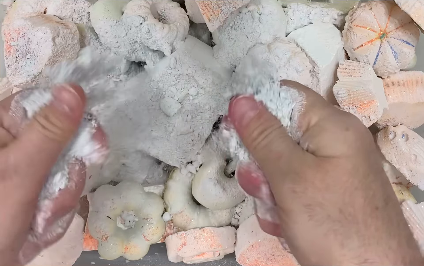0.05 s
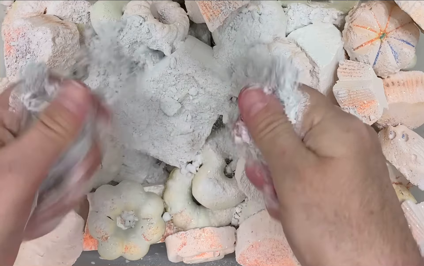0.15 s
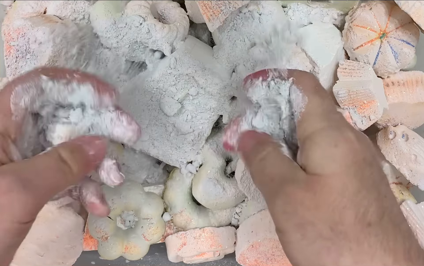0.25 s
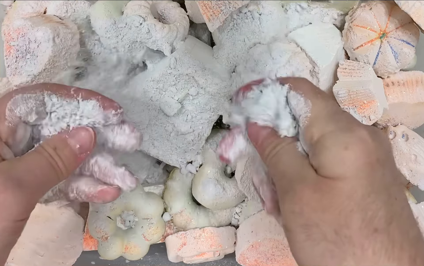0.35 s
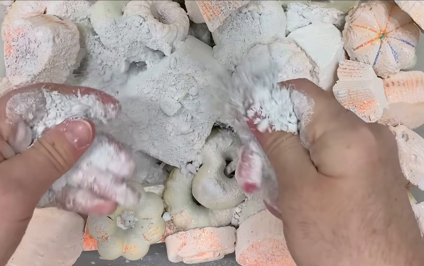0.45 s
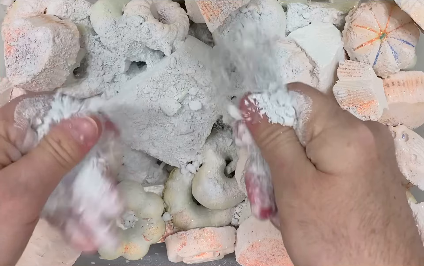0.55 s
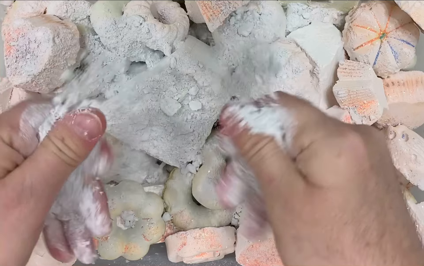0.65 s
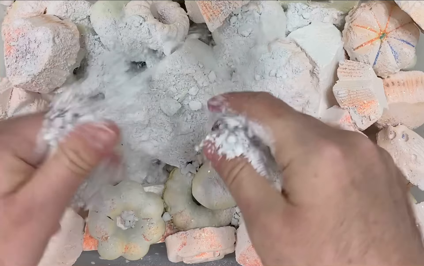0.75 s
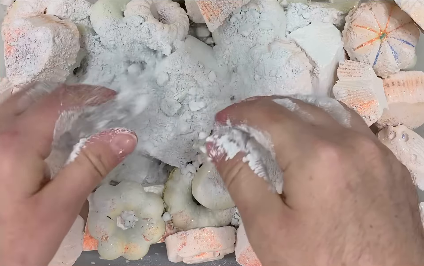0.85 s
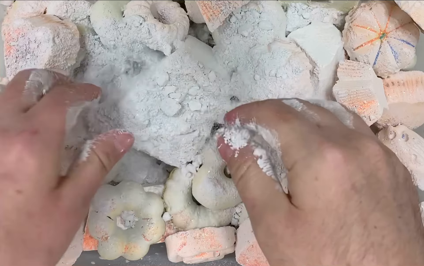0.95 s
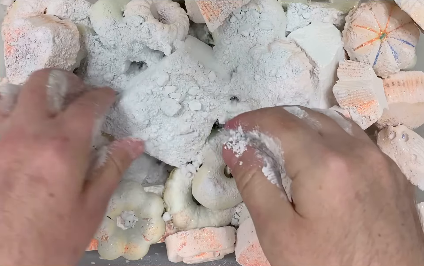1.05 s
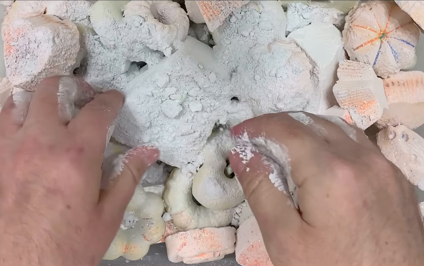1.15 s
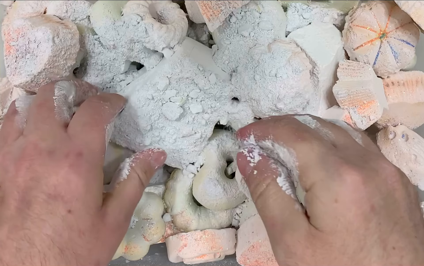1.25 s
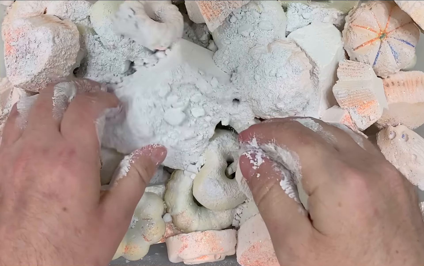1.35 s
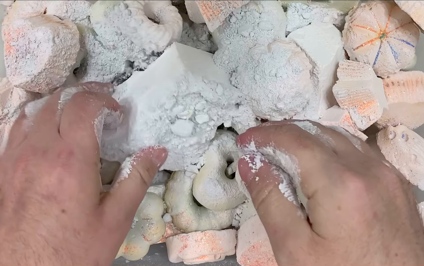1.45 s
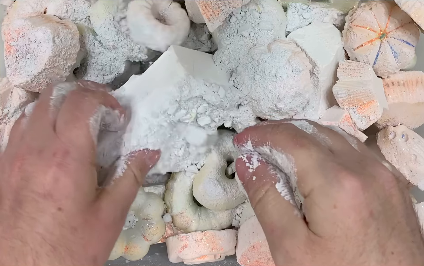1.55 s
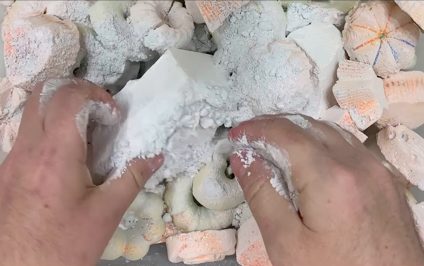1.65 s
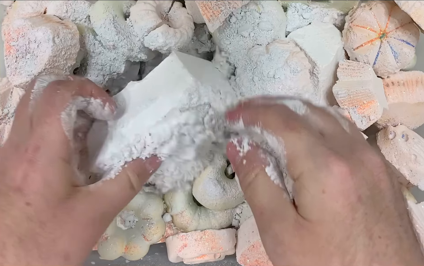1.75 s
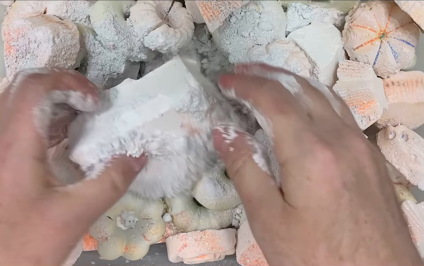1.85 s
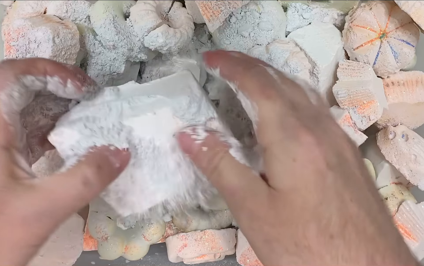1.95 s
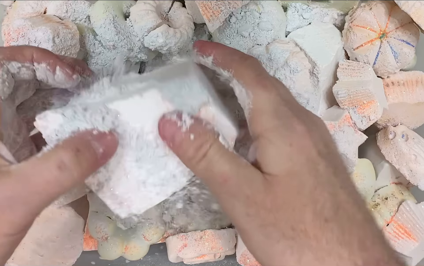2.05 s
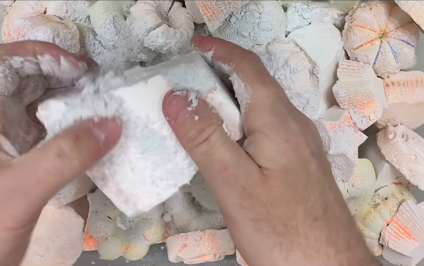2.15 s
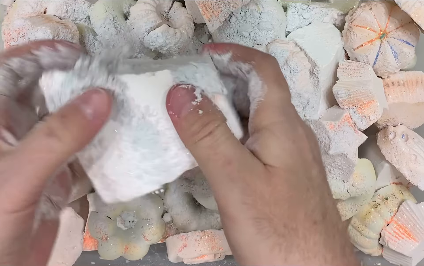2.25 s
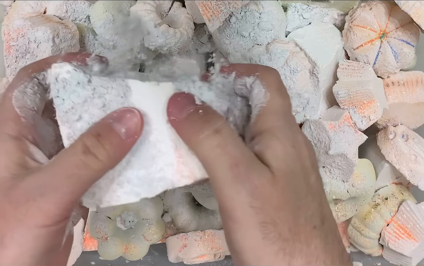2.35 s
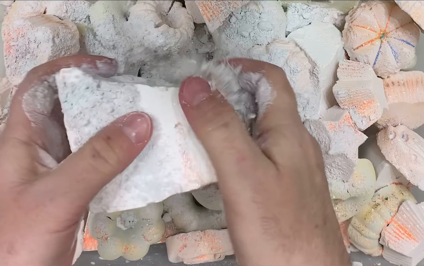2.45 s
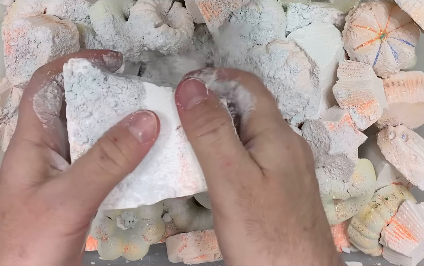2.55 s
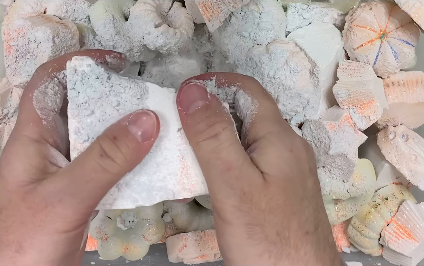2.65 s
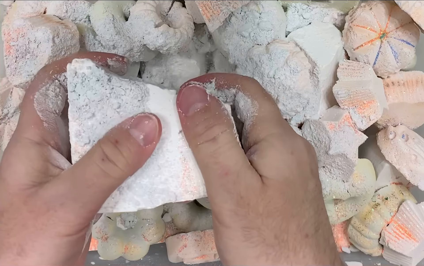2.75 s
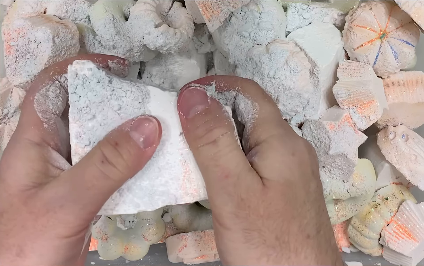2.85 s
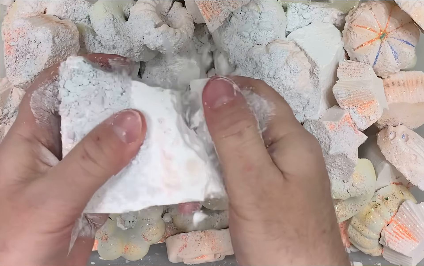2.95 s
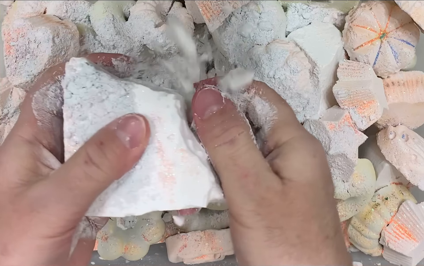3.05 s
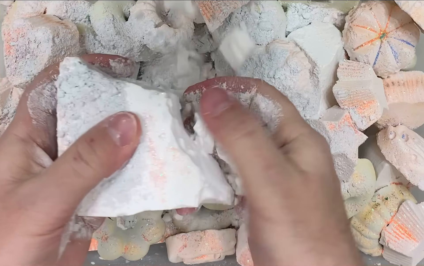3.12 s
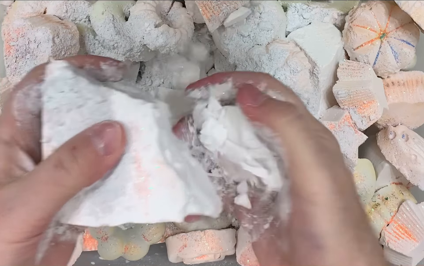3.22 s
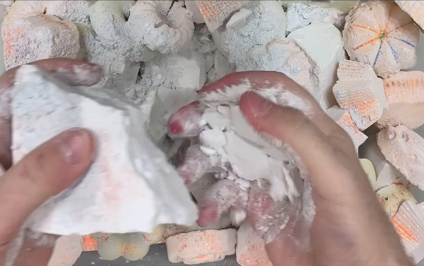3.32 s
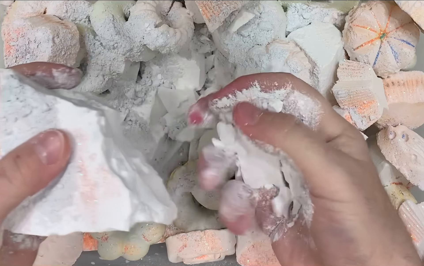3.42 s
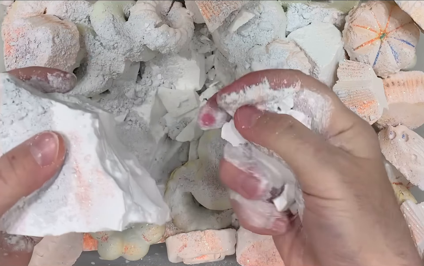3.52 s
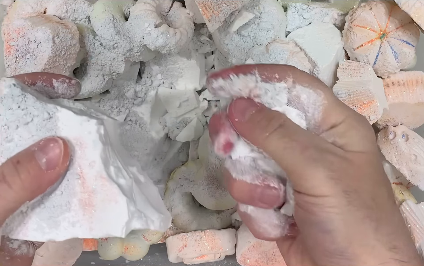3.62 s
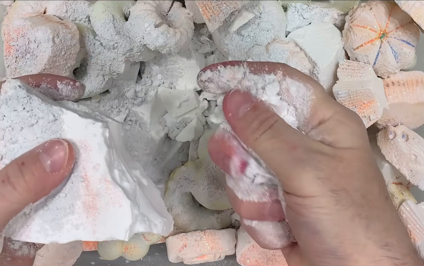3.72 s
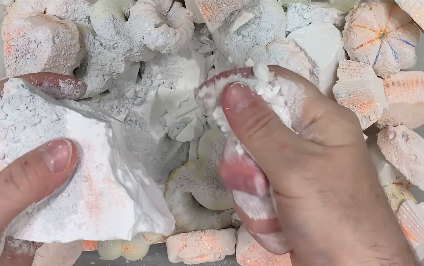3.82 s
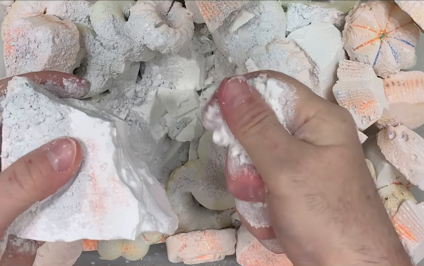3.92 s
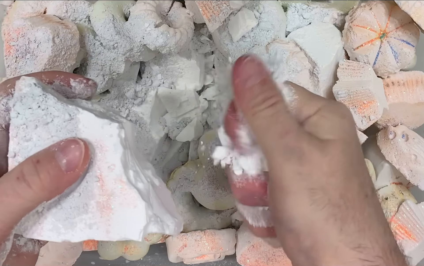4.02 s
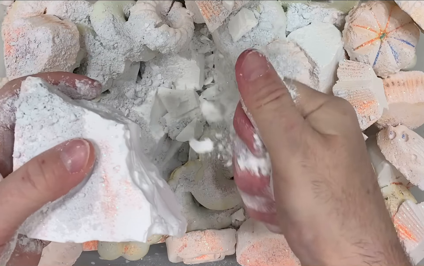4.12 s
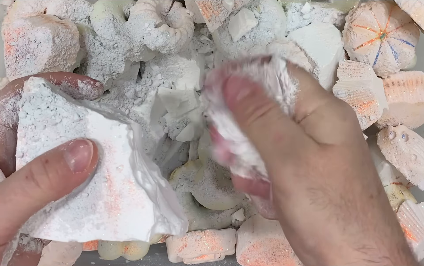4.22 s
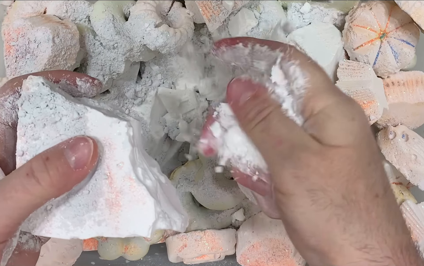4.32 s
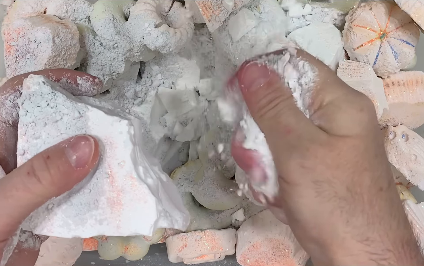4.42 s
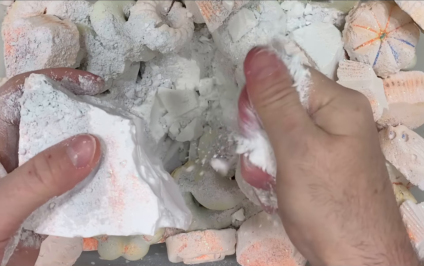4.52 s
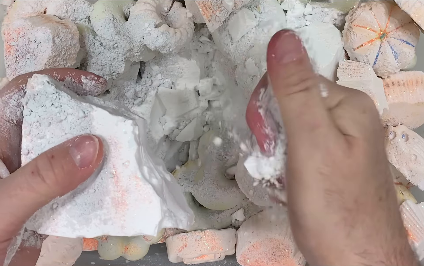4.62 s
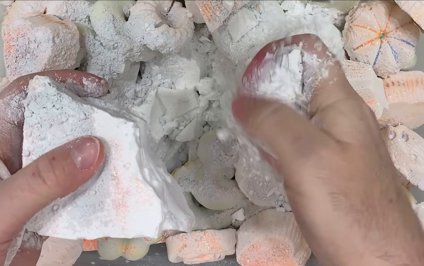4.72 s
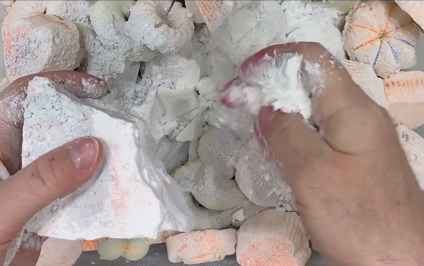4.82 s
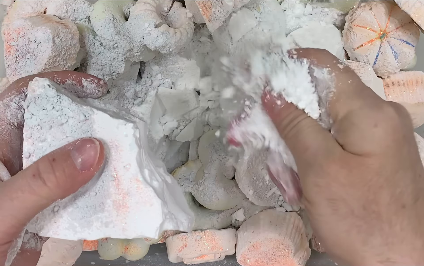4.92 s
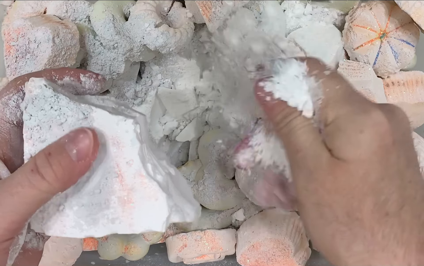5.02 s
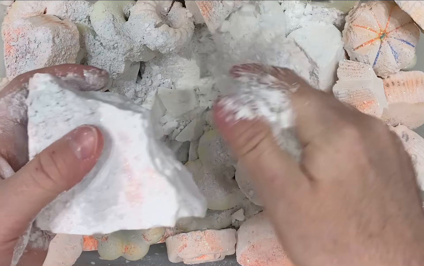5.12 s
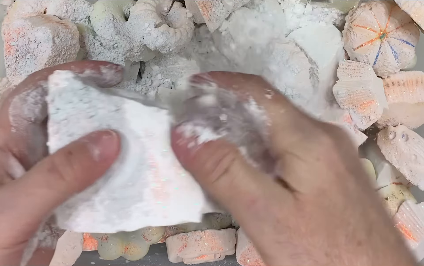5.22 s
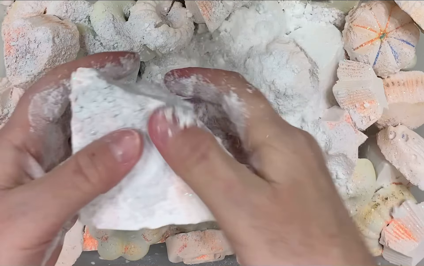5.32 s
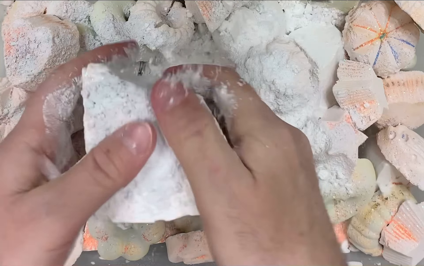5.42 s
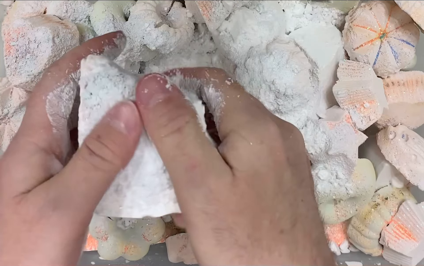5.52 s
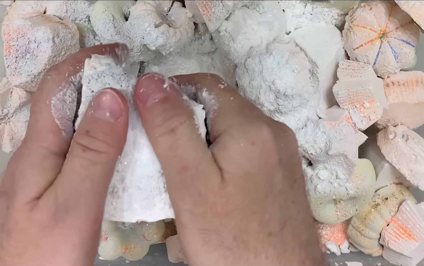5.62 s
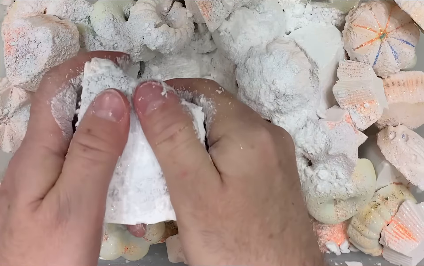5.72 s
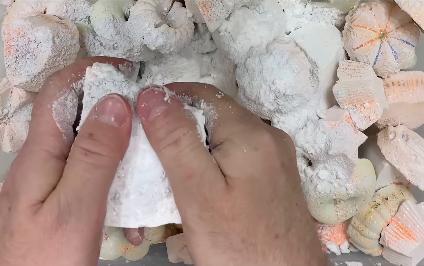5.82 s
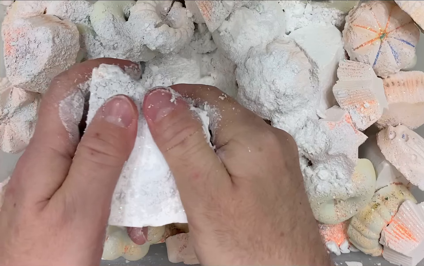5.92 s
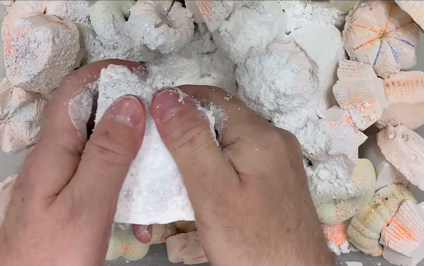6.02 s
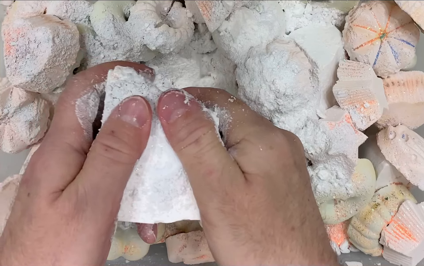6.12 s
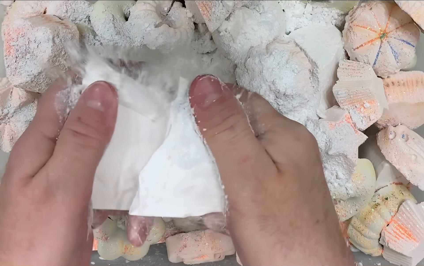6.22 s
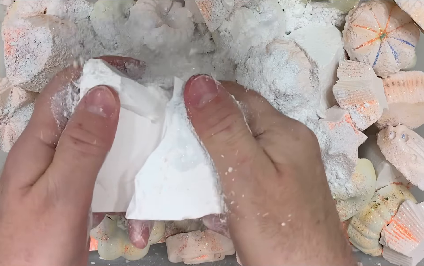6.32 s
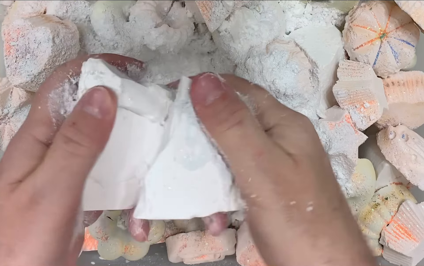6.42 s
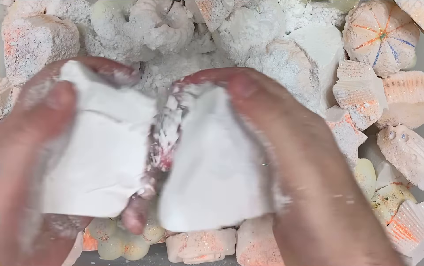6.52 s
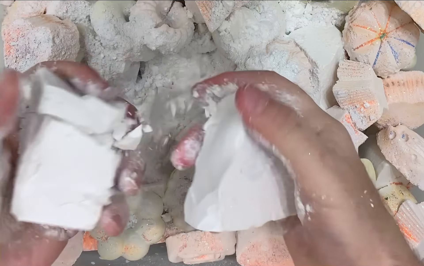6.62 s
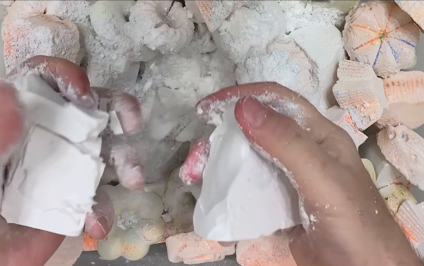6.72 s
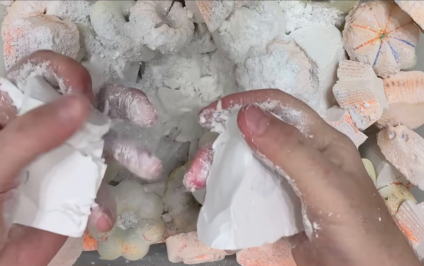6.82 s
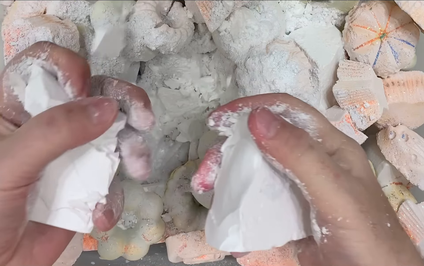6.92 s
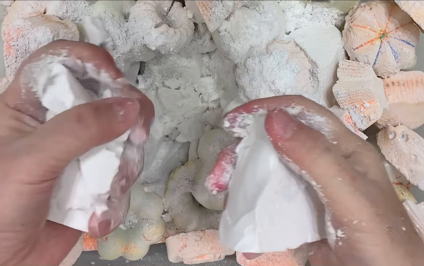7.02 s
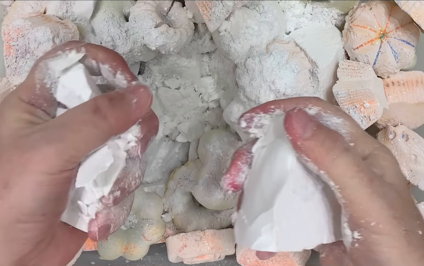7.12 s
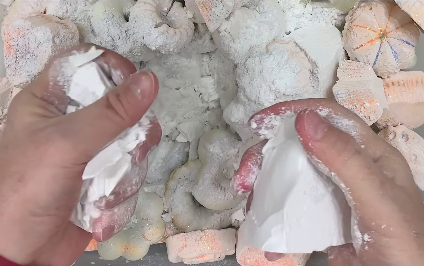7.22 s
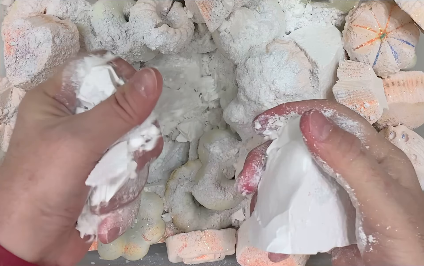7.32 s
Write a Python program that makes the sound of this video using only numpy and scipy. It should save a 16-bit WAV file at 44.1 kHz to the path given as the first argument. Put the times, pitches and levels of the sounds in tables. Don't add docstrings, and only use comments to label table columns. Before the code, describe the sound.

Dry chalk is squeezed and broken by hand very close to a stereo microphone in a quiet room. Crunchy bursts come first, then a soft lull of faint knocks and pings. A dense run of crushing follows around the middle, thinning to scattered crumbs and rolling lumps, before a heavy break and a final loud, clipped crush over faint hiss.

```python
import sys
import numpy as np
from scipy import signal
from scipy.fft import rfft, irfft, next_fast_len
from scipy.io import wavfile
from scipy.ndimage import uniform_filter1d

SR = 44100
rng = np.random.default_rng(int(sys.argv[2]) if len(sys.argv) > 2 else 0)


def file_out(sig):
    cols = np.atleast_2d(sig).T
    lim = np.clip(cols, -1, 1)
    pcm = np.round(lim * 32767).astype(np.int16)
    wavfile.write(sys.argv[1], SR, pcm)


def ratio_of_db(decibels):
    return 10 ** (np.asarray(decibels, float) / 20)


N = 325017

# (frequency [Hz], density [dB per Hz])
HISS = [(40, 13), (150, -47), (500, -60), (1500, -1.5), (4000, -12), (8000, -12.5), (15000, -10)]
HISS_DB = -39
# (frequency [Hz], width [Hz], level [dB])
ROOM_MODES = [(62.7, 15, 0.5), (120.9, 11, -4), (233, 57, -5.5)]
ROOM_T60_S, ROOM_DB = 0.19, -11
# (frequency [Hz], likeness [0-1], phase turn [rad])
PORTS = [(200, .96, -.2), (450, .4, -1.1), (1100, .15, -1.6), (2500, .5, -2.1), (3600, .78, -3.5),
         (4700, .84, -3.65), (9000, .88, -3.25), (13200, .88, -3.1)]
PORT_LAG_S = 10 / SR

# (time [s], squeeze [dB], fineness of the crumbs [dB], weight on the table [dB])
WORK = [(0, -22, -2, -30), (.61, -25.5, -3.5, -35), (1.5, -46, 5, -25), (2.26, -26, -0.5, -37),
        (2.87, -46.5, 0.5, -40), (3.05, -8.5, -24.5, -35.5), (3.3, -28.5, -6, -25.5), (3.69, -9, 1, -30.5),
        (4.0, -15.5, -0.5, -32.5), (4.14, -23, -7.5, -40), (4.45, -21, -5, -29.5), (4.68, -26, -5.5, -39),
        (5.3, -21, -8, -32), (5.68, -43, 4.5, -39.5), (6.15, -54, -2, -41.5), (6.33, -21.5, 0, -36),
        (6.78, -32.5, 9.5, -39.5), (7.1, -3, -6.5, -25.5)]
SQUEEZE_DB, DUST_DB, LUMP_DB, TABLE_DB = -10, -4.5, -1.5, 2
LUMP_FOLLOWS = 0.048
# (time [s], lumps [dB], grit [dB])
LEVEL_DIPS = [(.205, -3, -4.5), (.905, -5.5, -4.5), (2.23, -11, -15.5), (3.065, -23, -1), (3.69, -22, -9),
              (4.685, -8, -10), (6.4, -6, 0.5), (6.965, -8, 1), (7.29, -2, -8), (7.334, 1.5, -8),
              (3.12, 3.5, -4), (6.225, -2, -1.5)]
DIP_S = 0.022
# (ring [Hz], level [dB])
CRUMBS = [(170, -14.5), (330, -13.5), (900, -6.5), (1400, -0.5), (2500, -2), (4000, 4.5), (7500, 1.5),
          (15500, -5)]
LUMP_TOP_HZ, GRIT_TOP_HZ = 900, 4300
SHARD_DB = -6.5

# (time [s], peak [dB], ring [Hz], T60 [s])
THUMPS = [(0.77, -23, 69, 0.13), (1.45, -18, 83, 0.16), (1.645, -17.5, 59, 0.062), (2.0, -23.5, 65.4, 0.1),
          (2.15, -24, 70, 0.11), (2.92, -20, 118, 0.16), (3.18, -16, 135, 0.18), (4.3, -55, 76, 0.11),
          (5.85, -23.5, 58, .15), (6.18, -2.5, 124.5, 0.04), (6.74, -23.5, 61, 0.095)]
# (time [s], peak [dB], ring [Hz], T60 [s])
KNOCKS = [(0.869, -21.5, 230, 0.085), (1.191, -33, 171, 0.06), (1.296, -6, 692, 0.036),
          (1.337, -23, 716, 0.18), (1.441, -13.5, 270, 0.029), (1.598, -16.5, 250, 0.051),
          (1.626, -14, 276, 0.042), (1.966, -17, 785, 0.16), (2.17, -10, 745, 0.0083),
          (2.896, -13, 236, 0.2), (3.17, -8, 250, 0.091), (3.18, -6.5, 460, 0.1),
          (3.406, -12.5, 502, 0.049), (3.723, -19.5, 700, 0.02), (3.856, -21.5, 264, 0.086),
          (4.243, -14.5, 486, 0.077), (5.285, -8, 856, 0.072), (5.703, -21, 676, 0.17),
          (6.168, -3, 225, 0.048), (6.306, -8.5, 820, 0.03), (6.817, -25, 750, 0.018),
          (6.946, -9, 764, 0.075), (6.991, -5.5, 278, 0.045), (7.07, -11, 262, 0.037),
          (7.245, -6.5, 600, 0.044)]
KNOCK_GRIT_DB, SHOVE_DB, SHOVE_T60_S = -29, -36, 0.25
# (time [s], peak [dB], ring [Hz])
THUDS = [(.855, -13, 260), (.935, -15, 300), (7.246, 4, 396), (2.388, -19, 455), (3.49, -9, 258),
         (5.085, -19, 250), (5.288, -8, 427), (5.605, -16, 790), (6.165, -9, 290), (6.995, -21, 278),
         (7.07, -11, 258)]
# (time [s], lumps [dB], T60 [s])
ROLLS = [(0.171, -5, 0.15), (0.701, -21, 0.12), (1.532, -19, 0.084), (1.57, -7.5, 0.055), (2.059, -4, 0.33),
         (3.276, 1, 0.037), (4.4, -31, 0.32), (5.098, -5, 0.45), (5.2, -12, 0.043), (5.38, -1.5, 0.22),
         (6.382, -12, 0.072), (6.472, -6.5, 0.022), (6.692, -5, 0.15), (6.819, -1.5, 0.061),
         (7.211, -9, 0.06)]
ROLL_HZ, ROLL_RING_DB = 271, -16.5

# (time [s], grit [dB], T60 [s], ring of the piece [Hz])
SNAPS = [(0.0, 2, 0.045, 1730), (0.028, -6.5, 0.37, 760), (0.343, -6, 0.12, 1780),
         (0.379, 1.5, 0.058, 1420), (0.397, 8, 0.054, 1450), (0.432, -5.5, 0.14, 1470),
         (0.871, -4.5, 0.21, 2810), (0.927, -6.5, 0.17, 3220), (1.125, -18.5, 0.26, 1440),
         (1.299, -27, 0.019, 790), (1.882, -19.5, 0.4, 1590), (1.962, -5, 0.034, 900),
         (2.054, -17.5, 0.025, 800), (2.088, -13.5, 0.065, 1780), (2.11, -2, 0.011, 840),
         (2.173, -47, 0.035, 762), (2.381, -4.5, 0.0093, 2890), (2.516, -13.5, 0.16, 1560),
         (3.039, -3, 0.018, 2360), (3.13, 1, 0.02, 1290), (3.353, -10, 0.079, 870), (3.4, -6.5, 0.2, 860),
         (5.152, -3, 0.046, 1470), (5.251, -11, 0.02, 800), (5.347, -2.5, 0.11, 1020),
         (5.453, -2, 0.078, 880), (5.728, -12, 0.063, 1450), (6.158, -0.5, 0.085, 1370),
         (6.815, -7, 0.087, 796), (7.125, 3, 0.041, 3140)]
# (time [s], grit [dB], T60 [s], ring of the piece [Hz])
CRUMBLES = [(0.328, -12.5, 0.066, 1530), (0.548, -3, 0.097, 1570), (0.822, -10, 0.19, 3800),
            (2.889, -2.5, 0.098, 1470), (3.172, -8.5, 0.12, 676), (3.252, -2.5, 0.054, 2160),
            (3.471, 3.5, 0.06, 1410), (3.493, 5, 0.16, 1740), (3.579, -10, 0.12, 2880),
            (3.631, 5.5, 0.063, 1890), (3.731, 5.5, 0.14, 1500), (3.852, 4.5, 0.07, 1320),
            (3.912, -1, 0.12, 3040), (3.999, -8.5, 0.13, 1770), (4.235, -1.5, 0.11, 970),
            (4.402, -15.5, 0.34, 1880), (4.734, -21, 0.11, 1890), (4.842, -11, 0.34, 1770),
            (5.079, -14, 0.13, 1540), (5.287, -21, 0.32, 840), (5.492, -11, 0.32, 3230),
            (6.24, -8, 0.21, 1250), (6.85, -5.5, 0.23, 2370), (6.942, 10.5, 0.062, 2740),
            (6.99, 2, 0.13, 1430), (7.022, 5, 0.26, 1550), (7.173, -12, 0.23, 1610),
            (7.243, 12, 0.041, 820), (7.343, 0, 0.086, 2630)]
# (time [s], dust [dB], T60 [s])
PUFFS = [(0.147, -16, 0.048), (0.273, -15, 0.14), (0.523, -13.5, 0.42), (0.686, -7.5, 0.32),
         (2.288, -5, 0.34), (2.331, -5, 0.091), (2.703, -19, 0.046), (3.215, -2, 0.11), (3.714, 3, 0.05),
         (3.962, 0, 0.3), (4.185, -9.5, 0.33), (4.219, -7.5, 0.081), (6.596, -6.5, 0.13)]
# (time [s], grit [dB], lumps over grit [dB], dust over grit [dB], ring [Hz])
BREAKS = [
    (2.903, 7, -32, 7, 1810),
    (6.166, 17.5, 0, -4, 1260),
]
BREAK_T60_S, PUFF_HZ = 0.21, 3000
# (lumps [dB], dust [dB])
SNAP_MIX, CRUMBLE_MIX, PUFF_MIX = (-0.19, -29), (-2, 1), (-2.5, 11.7)
KNOCK_MIX, ROLL_MIX = (36.4, -21), (16, -6)

# (time [s], peak [dB], ring [Hz], T60 [s])
SLABS = [(0.44, -5.5, 1480, 0.16), (0.98, -21, 483, 0.16), (1.305, -13.5, 1560, 0.097),
         (1.625, -21, 417, 0.066), (1.645, -13.5, 219, 0.07), (2.4, -40, 470, 0.12),
         (2.65, -27.5, 760, 0.06), (2.925, 1, 2080, 0.2), (2.96, -7.5, 1930, 0.73),
         (3.633, -5, 1880, 0.072), (3.755, 1, 1790, 0.071), (3.87, -2.5, 1340, 0.13),
         (4.86, -16.5, 1820, 0.32), (5.3, -16, 463, 0.23), (6.185, -4, 1300, 0.1), (6.21, 13, 1186, 0.11),
         (6.22, -8, 2390, 0.15), (6.24, -6, 1320, 0.17), (6.275, -3, 1300, 0.39), (6.26, -4, 2300, 0.25),
         (7.07, -6, 1500, .08), (1.445, -15, 337, 0.042), (3.185, -21, 382, 0.067),
         (4.24, -17.5, 202, 0.28), (5.85, -31, 1610, 0.18), (5.95, -38, 1700, .14), (6.19, -6, 2590, 0.1),
         (0.01, -8.5, 1900, 0.26)]
# (time [s], peak [dB], ring [Hz])
FLECKS = [(0.0304, -9, 2090), (0.8417, -9, 4280), (1.4074, -29, 3280), (1.525, -27, 1770),
          (1.6244, -25, 3200), (1.719, -20.5, 3260), (1.7444, -24, 2960), (1.7853, -25, 3540),
          (1.8805, -26, 1400), (1.8975, -34, 1550), (1.9405, -17, 3300), (2.008, -18, 1490),
          (2.1104, -19, 1380), (2.1544, -23, 1410), (2.2794, -22, 3750), (2.2883, -19, 3730),
          (2.415, -20, 2750), (2.5, -20.5, 3300), (2.5174, -12, 1670), (2.5643, -20, 2740),
          (2.6203, -21.5, 3320), (2.7145, -21, 1610), (4.6673, -20, 3680), (5.046, -10, 3580),
          (5.1377, -17, 1500), (5.451, -7, 3822), (5.493, -4, 3884), (6.597, -13, 3960),
          (6.6564, -28, 4080)]
# (time [s], peak [dB], centre [Hz])
SPLINTERS = [(0.276, -4, 3040), (0.378, 2, 1490), (0.408, 3, 3630), (0.45, -15, 1330), (0.475, -17, 1510),
             (0.522, -13, 1710), (0.552, 5, 2290), (0.567, -8, 3300), (0.702, -2, 1770), (0.873, -3, 2890),
             (1.965, -25, 3230), (2.169, -19, 1490), (3.131, -9, 1280), (3.401, -8, 1390), (3.445, 2, 1390),
             (3.471, -20, 1470), (3.513, 6, 2440), (3.583, 9, 2960), (3.62, 3, 1790), (3.632, -1, 2000),
             (3.654, 7.5, 2280), (3.713, -3, 3710), (3.73, 20, 1400), (3.913, -5, 3010), (3.926, -17, 3010),
             (4.0, 19, 1820), (4.022, -12, 1750), (4.053, -3, 1390), (4.093, 2, 1850), (4.237, 4, 1940),
             (4.402, -1, 1940), (4.613, -8.5, 1510), (4.777, -17, 1770), (4.845, -11, 1850),
             (5.08, 7, 1520), (5.157, -24, 1500), (5.228, -27, 1380), (5.338, -19, 2940),
             (5.353, -29, 1200), (5.454, -20, 3770), (5.49, -1, 3770), (5.697, -12, 1500), (6.308, 4, 2320),
             (6.38, -6, 1520), (6.455, -10, 1620), (6.872, 13, 1890), (6.942, 6, 2650), (6.987, 19, 2350),
             (7.001, 9, 1560), (7.022, 5, 3430), (7.068, -6, 1530), (7.124, 5, 3220), (7.172, -13, 3430),
             (7.303, -10, 2330), (7.315, 9, 1630), (7.346, 17, 2850), (7.361, 27, 3730)]
SPLINTER_T60_S, FLECK_T60_S = 0.0044, 0.032
# (time [s], peak [dB], ring [Hz])
CHIPS = [(0.031, -6, 2630), (0.378, -10, 1760), (0.438, 2.5, 1690), (0.523, -5.5, 1730), (0.564, 8, 4230),
         (0.63, -7, 1820), (0.932, 6, 4800), (1.045, -14, 3400), (1.968, -13, 4500), (2.008, -16.5, 1350),
         (3.046, 1, 4650), (3.254, -1, 4000), (3.595, 1, 4700), (3.8, 7, 1570), (4.052, -12, 4300),
         (4.347, -9.5, 1780), (4.379, -9, 1900), (4.948, -9.5, 3450), (5.079, -15, 2740),
         (5.199, -12, 4300), (5.228, -10.5, 1540), (5.339, -11, 3050), (6.383, -6.5, 1370),
         (6.635, -10, 4300), (6.656, -3.5, 3540), (6.992, -11, 2780), (7.071, 3, 1530), (1.538, -19, 740),
         (7.345, 21, 3700),
         (0.279, -9, 12100), (0.298, -11, 8800), (0.549, -3, 5800), (1.808, -16, 5800),
         (2.385, -11.5, 6600), (2.995, -3, 9700), (3.108, -16, 6160), (3.186, -2, 13700),
         (3.217, -21, 4800), (3.445, 1.5, 6400), (3.475, 0, 5200), (3.913, 1, 6170), (3.927, -12, 6170),
         (3.967, -4, 6570), (4.0, 11, 7100), (4.092, -1.5, 5730), (4.473, -7.5, 13000), (5.118, -9, 5360),
         (6.295, -4, 7960), (6.31, -2, 9700), (6.394, -8.5, 10800), (6.691, -5.5, 10700), (6.721, 2, 5650),
         (6.816, -7, 13800), (6.879, 0, 9500), (7.244, -2, 6500), (7.306, -13, 6540)]
TICK_T60_S = 0.018
# (time [s], peak [dB], ring [Hz])
CLICKS = [(0.1617, -1, 3530), (0.1837, -7, 5080), (0.277, -12, 8480), (0.3787, 4, 1510), (0.4745, 0, 1500),
          (1.0417, -8, 3300), (1.1265, -10, 3540), (1.2313, -10, 2980), (1.8828, -13, 2400),
          (1.9666, -5, 4350), (2.0095, -8, 1560), (2.0884, -1.5, 1920), (2.5892, -4, 4200),
          (3.131, 1, 5040), (3.2183, -6, 4690), (3.2542, 8, 3790), (3.4009, 0.5, 1380), (3.4727, -1, 1810),
          (3.7147, -2, 5660), (3.9137, 2, 3060), (3.9676, 2, 6630), (4.0519, -1, 4570), (4.1671, -12, 2890),
          (4.2874, -12, 3700), (4.3801, -4.5, 1800), (5.1389, -2, 3320), (5.2018, 8, 4350),
          (5.2851, -8, 1100), (5.7281, -7, 1520), (6.3093, -1, 2160), (6.414, -23, 1390),
          (6.4559, -16, 4090), (6.8041, -3, 3960), (6.8156, -4, 3100), (6.8206, -1, 1790), (7.304, 9, 7670)]
RING_RISE = 0.08


def rms_one(x):
    return x / np.sqrt(np.mean(x ** 2) + 1e-20)


def in_time(rows):
    s, *columns = np.transpose(rows)
    return [np.interp(np.arange(N) / SR, s, c) for c in columns]


def at_hz(points, hz):
    known, *columns = np.transpose(points)
    return [np.interp(np.log(hz + 1e-9), np.log(known), c) for c in columns]


def resonate(x, hz, width_hz):
    r = np.exp(-np.pi * width_hz / SR)
    return signal.lfilter([1, 0, -1], [1, -2 * r * np.cos(2 * np.pi * hz / SR), r * r], x + 1e-18)


def drift(rate_hz, count):
    r = np.exp(-128 * np.pi * rate_hz / SR)
    noise = rng.standard_normal((count, N // 64 + 502))
    return rms_one(signal.lfilter([1], [1, -2 * r, r * r], noise)[:, 500:])


def rings(rows, level_db, cycles):
    out, t = np.zeros((2, N)), np.arange(SR // 4) / SR
    for s, peak_db, hz, t60 in rows:
        i = round(s * SR)
        fade = ratio_of_db(-60 * t / np.clip(t60, 0.006, 0.14)) * np.minimum(t / (RING_RISE * t60), 1)
        shake = rng.standard_normal((2, len(t))) * fade
        body = resonate(resonate(shake, hz, 11.0 * hz / cycles), hz, 1.34 * hz / cycles)
        body = ratio_of_db(peak_db + level_db) * body / np.abs(body).max()
        out[:, i:i + len(t)] += body[:, :N - i]
    return out


def strikes(rows, cycles):
    out, t = np.zeros((2, N)), np.arange(SR // 10) / SR
    for s, peak_db, hz in rows:
        i = round(s * SR)
        fade = ratio_of_db(peak_db - 60 * t * hz / cycles) * np.minimum(2 * hz * t, 1)
        ring = np.sin(2 * np.pi * hz * t + [[0], [np.pi / 2]]) * fade
        out[:, i:i + len(t)] += ring[:, :N - i]
    return out


def hiss():
    colour = ratio_of_db(at_hz(HISS, np.fft.rfftfreq(N, 1 / SR))[0])
    return ratio_of_db(HISS_DB) * rms_one(irfft(rfft(rng.standard_normal((2, N))) * colour, N))


def shoves():
    kicks, fade = np.zeros(N), ratio_of_db(-60 / (SHOVE_T60_S * SR))
    for s, db, _, _ in KNOCKS:
        kicks[round(s * SR)] = ratio_of_db(db + SHOVE_DB)
    return uniform_filter1d(signal.lfilter([1], [1, -fade], kicks), size=800)


def rumble(weight_db):
    modes = np.zeros((2, N))
    for hz, width_hz, db in ROOM_MODES:
        held = resonate(rng.standard_normal((2, N)), hz, width_hz)
        modes += ratio_of_db(db) * rms_one(resonate(held, hz, 2 * width_hz))
    return (ratio_of_db(weight_db + TABLE_DB) + shoves()) * rms_one(modes)


def room(x):
    t = np.arange(SR // 2) / SR
    tail = signal.lfilter([1], [1, -0.6], rng.standard_normal((2, len(t))))
    tail = tail * ratio_of_db(-60 * t / ROOM_T60_S) * (t > 0.004)
    tail = tail / np.sqrt(np.sum(tail ** 2, axis=1, keepdims=True))
    return ratio_of_db(ROOM_DB) * signal.fftconvolve(x, tail, axes=1)[:, :N]


def lumps():
    rolling = [(s, db, ROLL_HZ, t60) for s, db, t60 in ROLLS]
    out = rings(KNOCKS, level_db=6.5, cycles=7.7) + rings(THUMPS, level_db=4.0, cycles=12.8)
    return out + rings(rolling, level_db=ROLL_RING_DB, cycles=13.6)


def chips():
    rows = [(s - 0.001, db, hz, TICK_T60_S) for s, db, hz in CHIPS]
    return rings(rows, level_db=4.0, cycles=5.0)


def splinters():
    broad = rings([(s, db, hz, SPLINTER_T60_S) for s, db, hz in SPLINTERS], level_db=1.0, cycles=1.6)
    pings = rings([(s, db, hz, FLECK_T60_S) for s, db, hz in FLECKS], level_db=1.0, cycles=16.0)
    return broad + pings + rings(SLABS, level_db=0.5, cycles=9.5)


def pieces():
    return ([(s, db, *SNAP_MIX, t60, hz) for s, db, t60, hz in SNAPS]
            + [(s, db, *CRUMBLE_MIX, t60, hz) for s, db, t60, hz in CRUMBLES]
            + [(s, db - PUFF_MIX[1], *PUFF_MIX, t60, PUFF_HZ) for s, db, t60 in PUFFS]
            + [(s, db - ROLL_MIX[0], *ROLL_MIX, t60, ROLL_HZ) for s, db, t60 in ROLLS]
            + [(s, db, lump_db, dust_db, BREAK_T60_S, hz) for s, db, lump_db, dust_db, hz in BREAKS]
            + [(s, db + KNOCK_GRIT_DB, *KNOCK_MIX, t60, hz) for s, db, hz, t60 in KNOCKS])


def fracture_swarms(longer, rise):
    out, t = np.zeros((3, N)), np.arange(SR // 3) / SR
    for s, grit_db, lump_db, dust_db, t60, _ in pieces():
        i = round(s * SR)
        lasts = np.clip(t60, 0.006, 0.25) * np.array(longer)[:, None]
        swarm = ratio_of_db(grit_db - 9.0 + np.array([[lump_db], [0], [dust_db]]) - 60 * t / lasts)
        swarm = swarm * np.minimum(t / (rise * lasts), 1)
        out[:, i:i + len(t)] += swarm[:, :N - i]
    return out


def sparks(per_s, spread_db, shape):
    sizes = ratio_of_db(spread_db * np.minimum(rng.exponential(1, shape), 5))
    return sizes * (rng.random(shape) < per_s / SR)


def crackle(per_s, spread_db, t60, steady):
    fade = ratio_of_db(-60 / (t60 * SR))
    bursts = signal.lfilter([1], [1, -2 * fade, fade ** 2], sparks(per_s, spread_db, (4, N)))
    return rms_one(steady + rms_one(bursts[:3] + 1.7 * bursts[3]))


def squeeze(squeeze_db, fine_db, weight_db):
    lump_db = LUMP_DB + LUMP_FOLLOWS * squeeze_db + (1 - LUMP_FOLLOWS) * weight_db - fine_db / 2
    work_db = np.array([lump_db, squeeze_db + SQUEEZE_DB, squeeze_db + DUST_DB + fine_db])
    quick = crackle(per_s=150, spread_db=-7.5, t60=0.0075, steady=0.88)
    slow = crackle(per_s=38, spread_db=-12.0, t60=0.12, steady=11.0)
    return ratio_of_db(work_db) * quick * slow + fracture_swarms(longer=[1.6, 1.05, 0.8], rise=0.064)


def chalk(pressure, per_s, cycles, patchy_db):
    out, pitches = np.zeros((2, N)), np.geomspace(170, 15500, 40)
    swarms = []
    for rate in per_s:
        signs = rng.choice([-1, 1], (2, N))
        swarms.append(rms_one(sparks(rate, 1.7, (2, N)) * signs))
    shifts = rng.integers(0, N, 40)
    patches = uniform_filter1d(drift(14.8, count=40), size=2, axis=0)
    patches = ratio_of_db(patchy_db * rms_one(patches))
    for k, (hz, level_db) in enumerate(zip(pitches, at_hz(CRUMBS, pitches)[0])):
        size = int(hz > LUMP_TOP_HZ) + int(hz > GRIT_TOP_HZ)
        force = pressure[size] * np.repeat(patches[k], 64)[:N]
        width_hz = 2.6 * hz / cycles[size]
        even = np.sqrt(np.pi * width_hz / SR)
        hits = np.roll(swarms[size], shifts[k], axis=1) * force
        out += ratio_of_db(level_db - 12.5) * even * resonate(hits, hz, width_hz)
    return out


def crumbling(pressure):
    swarms = chalk(pressure, per_s=[250, 900, 2500], cycles=[8.0, 14.0, 22.0], patchy_db=6.5)
    shards = chalk(pressure, per_s=[8, 12, 20], cycles=[16.0, 40.0, 80.0], patchy_db=3.0)
    broken = rings(np.array(pieces())[:, [0, 1, 5, 4]], level_db=-3.2, cycles=5.24)
    return swarms + ratio_of_db(SHARD_DB) * shards + broken


def level_dips(x):
    s, lump_db, grit_db = np.transpose(LEVEL_DIPS)
    closed = np.exp(-((np.arange(0, N, 32)[:, None] / SR - s) / DIP_S) ** 2)
    lump_gain = np.repeat(ratio_of_db(closed @ lump_db), 32)[:N]
    grit_gain = np.repeat(ratio_of_db(closed @ grit_db), 32)[:N]
    low = signal.sosfilt(signal.butter(2, 1200, fs=SR, output="sos"), x)
    return low * lump_gain + (x - low) * grit_gain


def scene():
    squeeze_db, fine_db, weight_db = in_time(WORK)
    floor = hiss() + rumble(weight_db)
    in_hand = lumps() + chips() + crumbling(squeeze(squeeze_db, fine_db, weight_db))
    crush = level_dips(in_hand) + strikes(THUDS, cycles=14.4)
    return floor + crush + room(crush) + splinters() + strikes(CLICKS, cycles=18.0)


def top_cut(x):
    return signal.sosfilt(signal.butter(12, 15800, fs=SR, output="sos"), x)


def record(dry):
    size = next_fast_len(N + 2048)
    hz = np.fft.rfftfreq(size, 1 / SR)
    alike, turn = at_hz(PORTS, hz)
    alike = np.clip(alike, 0, 1)
    left, own = rfft(dry, size)
    late = left * np.exp(-1j * (turn + 2 * np.pi * hz * PORT_LAG_S))
    right = alike * late + np.sqrt(1 - alike ** 2) * own
    ports = np.array([dry[0] * ratio_of_db(-0.75), irfft(right, size)[:N]])
    return top_cut(np.clip(ports, -1, 1))


dry = scene()
out = record(dry)
file_out(out)
```